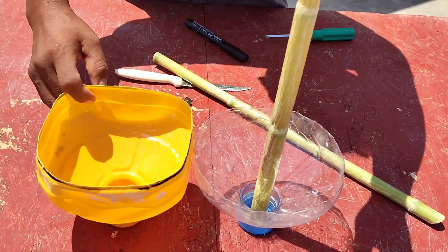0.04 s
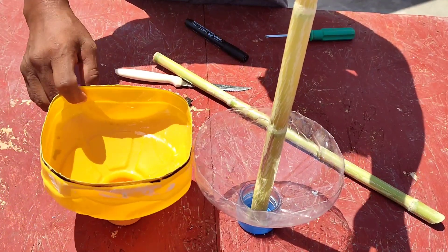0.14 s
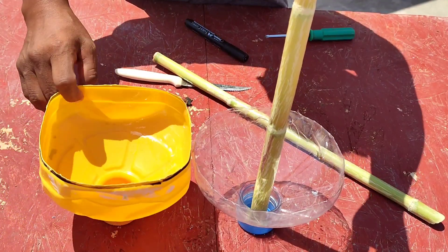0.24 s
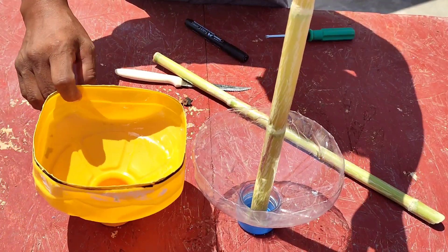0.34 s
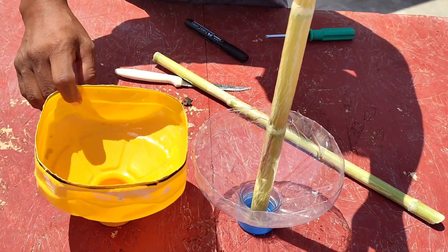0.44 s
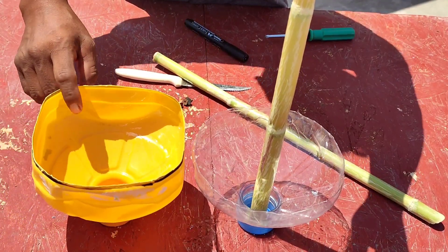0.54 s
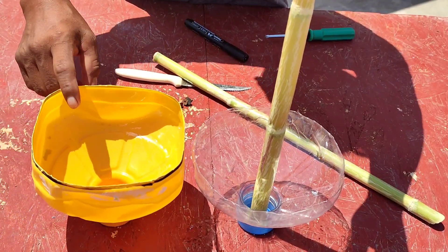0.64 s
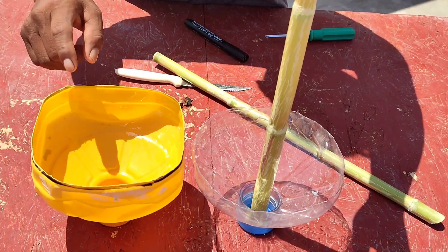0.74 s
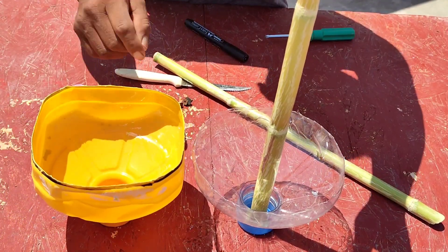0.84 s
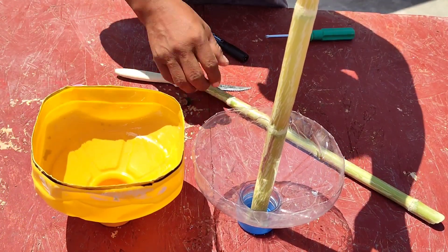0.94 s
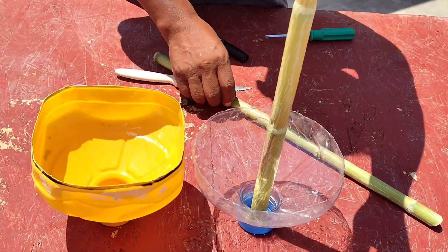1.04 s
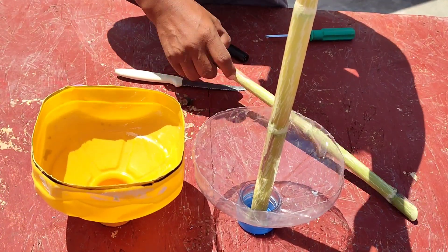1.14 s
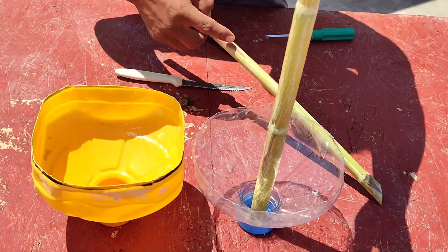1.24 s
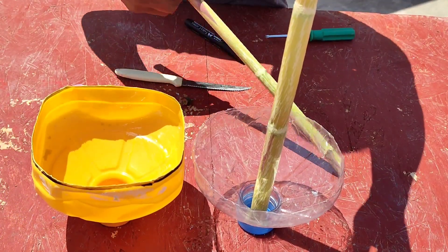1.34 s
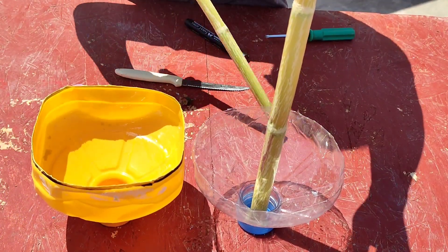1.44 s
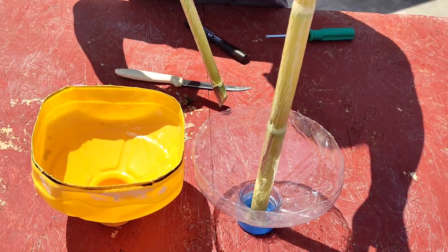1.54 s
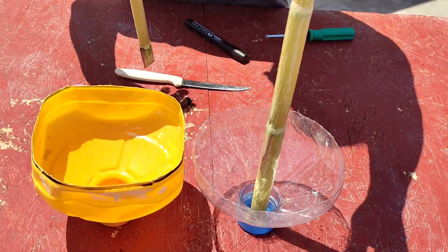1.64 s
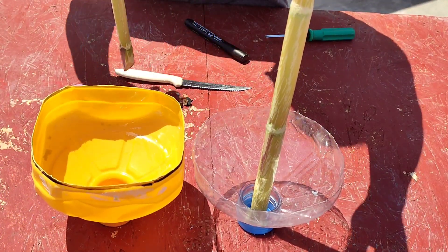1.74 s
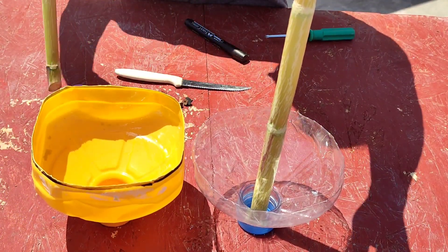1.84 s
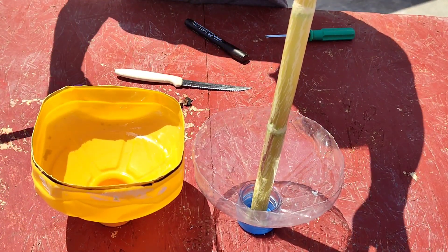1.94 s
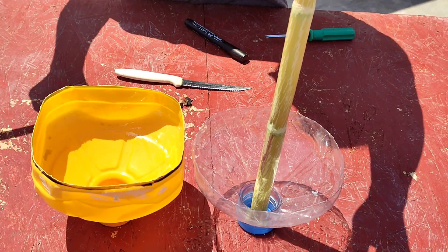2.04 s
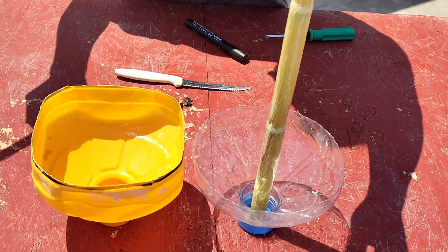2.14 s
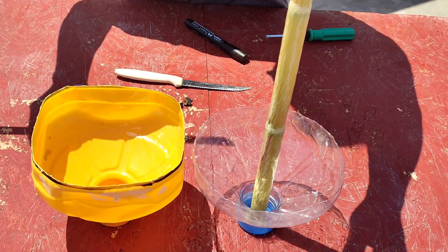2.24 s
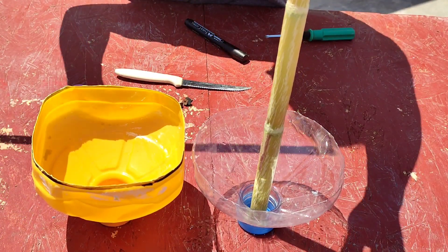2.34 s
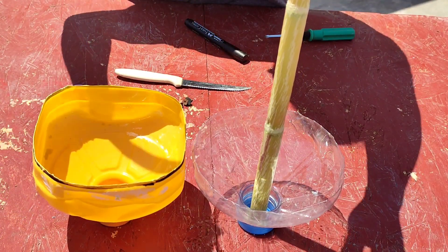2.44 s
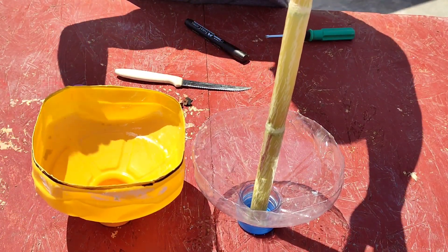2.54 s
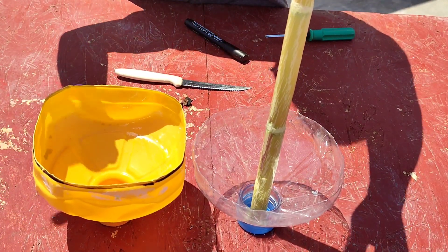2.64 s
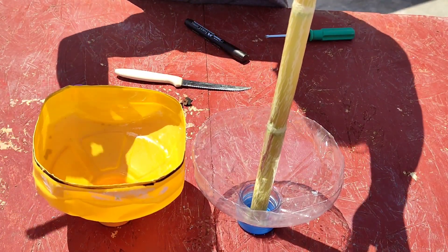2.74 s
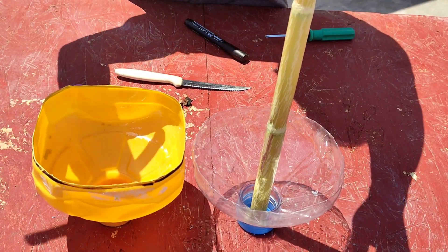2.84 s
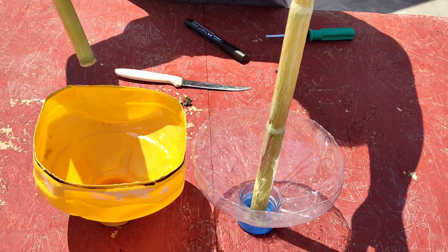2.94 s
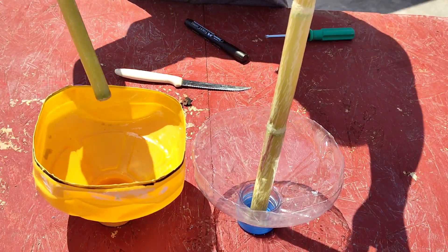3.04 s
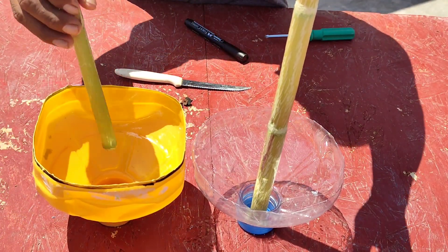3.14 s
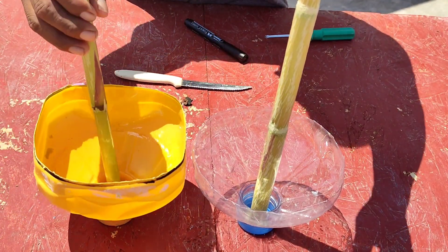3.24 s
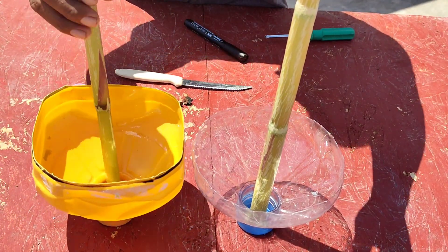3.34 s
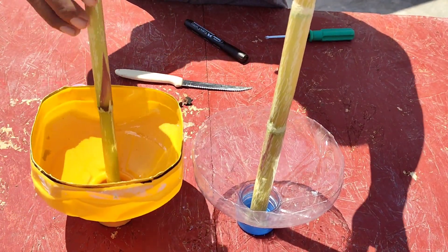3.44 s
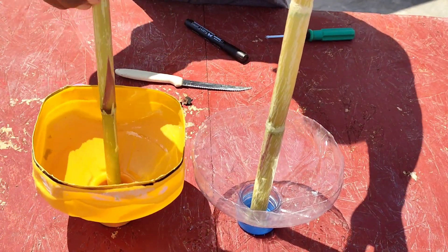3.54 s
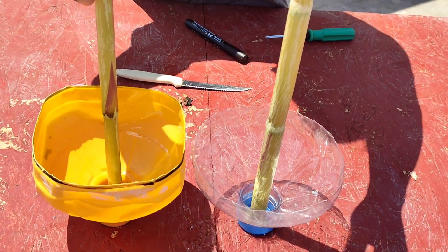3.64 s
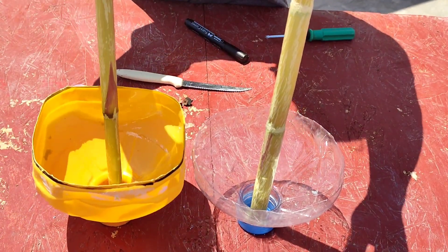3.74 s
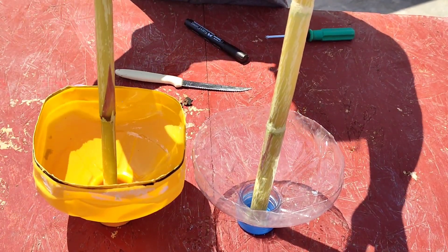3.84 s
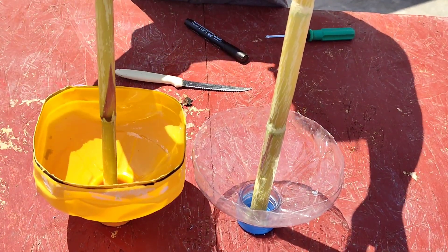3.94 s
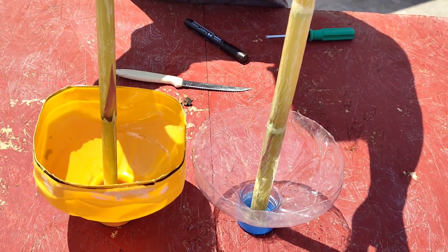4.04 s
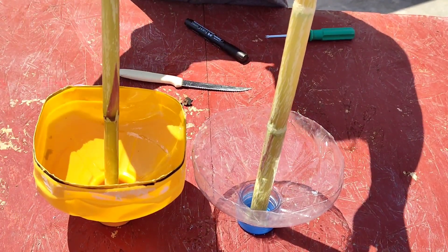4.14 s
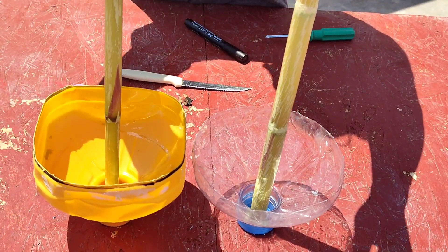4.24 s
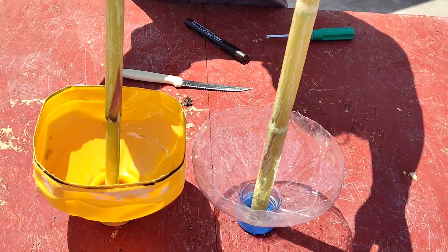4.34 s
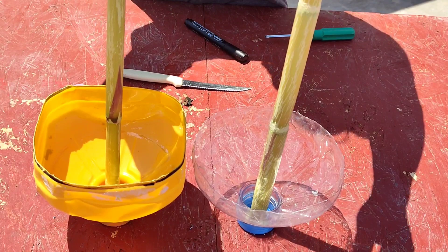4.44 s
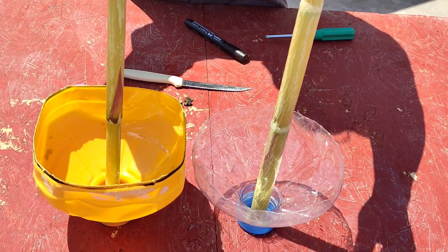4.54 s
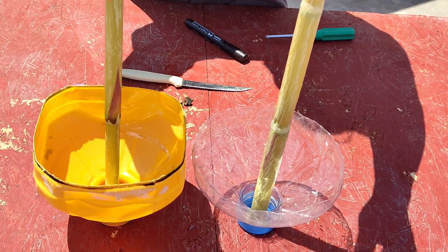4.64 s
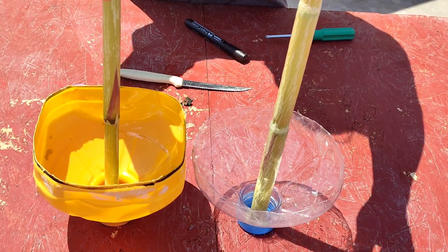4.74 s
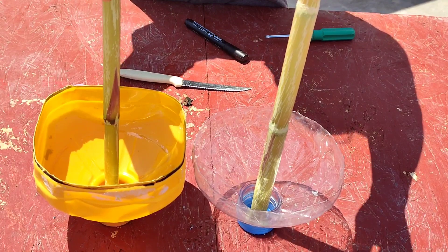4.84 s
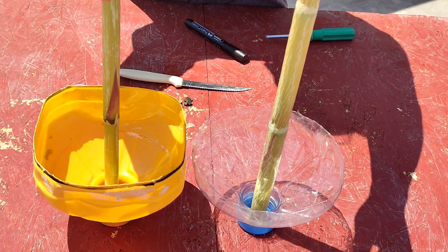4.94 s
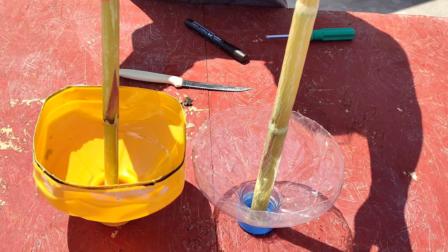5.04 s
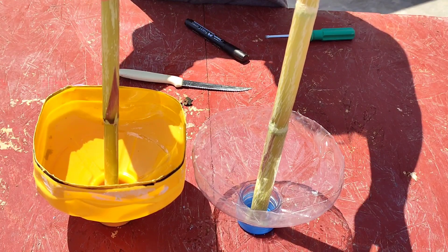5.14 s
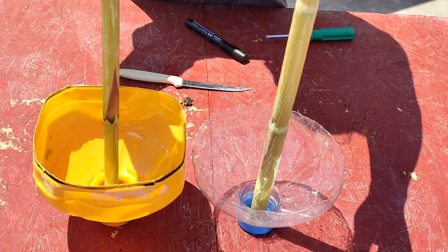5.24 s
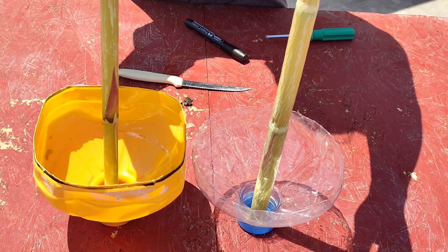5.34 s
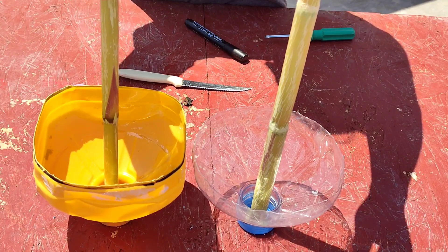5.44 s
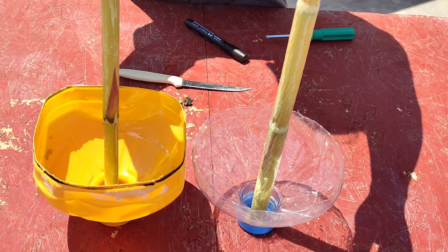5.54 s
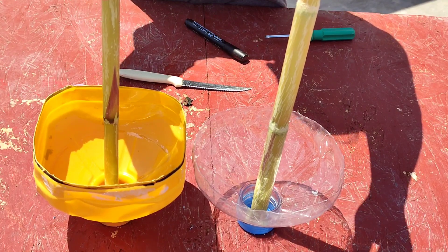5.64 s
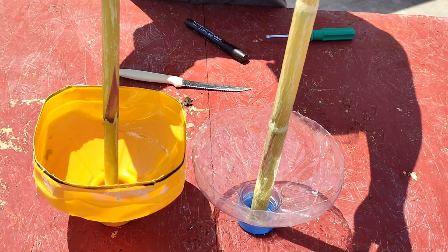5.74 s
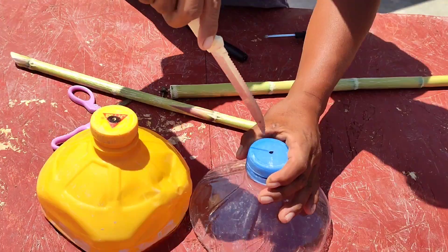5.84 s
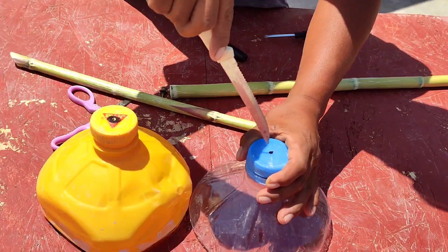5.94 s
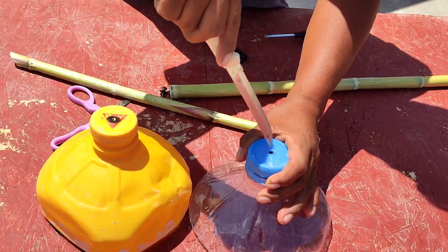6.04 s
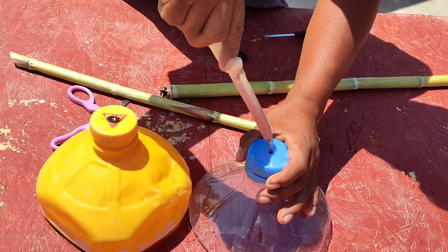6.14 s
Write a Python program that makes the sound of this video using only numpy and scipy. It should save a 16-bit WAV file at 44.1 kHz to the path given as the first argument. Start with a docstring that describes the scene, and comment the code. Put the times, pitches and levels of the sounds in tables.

```python
"""Hens cluck low and fast in a yard; hoarse squawks clear into a held note (pulsed membrane, throat filter).
Close by, a cane drags over a table and drops into a cut plastic bottle with one loud hollow knock,
among softer taps (contact pulses through bottle modes, plus rattle and crack noise).
Fingers hiss along the cane; light wind buffets the microphone over a faint yard hush (shaped noise).
"""
import sys
import numpy as np
from scipy import signal
from scipy.fft import rfft, irfft, next_fast_len
from scipy.io import wavfile

SR = 44100
rng = np.random.default_rng(int(sys.argv[2]) if len(sys.argv) > 2 else 0)


def dump_mix(stems):
    """Bounce the given channels to the path in sys.argv[1] as a 16-bit WAV at rate SR."""
    frames = np.atleast_2d(stems).T  # one column per channel
    limited = np.clip(frames, -1, 1)  # hard clip at full scale
    pcm = np.round(limited * 32767).astype(np.int16)
    wavfile.write(sys.argv[1], SR, pcm)


N = 272097
T = np.arange(N) / SR
TOP_HZ = 14350  # upper band limit


def undb(db):
    """Decibels to gain."""
    return 10 ** (np.asarray(db) / 20)


def unit(x):
    """Scale to rms 1."""
    return x / (np.sqrt(np.mean(x ** 2)) + 1e-12)


def seconds(length_s):
    """Time axis of one event, in seconds."""
    return np.arange(int(length_s * SR)) / SR


def add(out, start_s, x):
    """Mix x into out from start_s."""
    i = max(int(start_s * SR), 0)
    out[..., i:i + x.shape[-1]] += x[..., :N - i]


def colour(x, outline):
    """Filter by a (Hz, dB) outline, straight over log frequency."""
    hz, db = np.transpose(outline)
    n = next_fast_len(x.shape[-1])
    f = np.fft.rfftfreq(n, 1 / SR) + 1
    gain = undb(np.interp(np.log(f), np.log(hz), db))
    return irfft(rfft(x, n) * gain, n)[..., :x.shape[-1]]


def wobble(n, hz):
    """Random motion of rms 1, mostly slower than hz."""
    lowpass = signal.butter(2, hz, fs=SR, output="sos")
    settled = signal.sosfilt(lowpass, rng.standard_normal(n + SR // 10))[-n:]
    return unit(settled)


def stereo_noise(n, outline, shared):
    """Coloured noise; shared (0-1) is the power fraction common to both ports."""
    common, *own = rng.standard_normal((3, n))
    shared = np.clip(shared, 0, 1)
    mix = np.sqrt(shared) * common + np.sqrt(1 - shared) * np.array(own)
    return unit(colour(mix, outline))


def ports(x, lag_ms):
    """Delay the left port by lag_ms; a positive lag places the source to the right."""
    left, right = np.broadcast_to(x, (2, N))
    return np.array([np.interp(T - lag_ms / 1000, T, left), right])


def swell(t, length, rise, fall):
    """Sine-squared opening and closing, all in seconds."""
    opening = np.sin(np.pi / 2 * np.clip(t / rise, 0, 1)) ** 2
    closing = np.sin(np.pi / 2 * np.clip((length - t) / fall, 0, 1)) ** 2
    return opening * closing


def syrinx(hz, rough, jitter, jitter_hz, air):
    """Phase and band-limited pulses of an unevenly beating membrane, with a puff of air each cycle."""
    uneven_hz = hz * (1 + jitter * rough * wobble(len(hz), jitter_hz))
    phase = 2 * np.pi * np.cumsum(uneven_hz) / SR + 1e-6
    count = int(TOP_HZ / np.max(hz))  # harmonics
    pulses = np.sin((count + .5) * phase) / (2 * np.sin(phase / 2)) - .5
    pulses = pulses / np.sqrt(count / 2)
    puffs = air * rough * (1 + np.cos(phase)) * rng.standard_normal(len(hz))
    return phase, pulses + puffs


# Clucks. Each row: start in seconds, length in seconds, nominal pitch in Hz, voice gain in dB,
# upper-band brightness in dB.
CLUCKS = [(0.055, 0.049, 235.4, -55.5, 1), (0.185, 0.043, 237, -56, -4), (0.319, 0.041, 243.6, -57.5, -5.5),
          (0.461, 0.026, 232, -54.5, -1.5), (.607, 0.044, 218.5, -57, -14), (0.746, .044, 225.8, -54.5, -4),
          (0.883, 0.072, 242, -56.5, 0), (1.223, 0.059, 258.1, -52, -2), (2.381, 0.044, 233.3, -60, -6),
          (2.523, .047, 236.5, -57, -7), (2.67, 0.036, 235.7, -51.5, -9), (2.807, .052, 244.8, -52, -7),
          (2.953, 0.047, 251.8, -48.5, -13.5), (3.887, 0.0545, 241.2, -50.5, -7),
          (4.055, 0.061, 225.2, -53.5, -8), (4.226, 0.049, 226.6, -51.5, -9),
          (4.407, 0.04, 227.8, -53, -9.5), (4.562, 0.042, 219.1, -51, -8), (4.686, 0.054, 242.8, -51.5, -5),
          (4.816, 0.055, 236, -52.5, -0.5), (4.958, 0.052, 259.8, -52.5, 0),
          (5.091, 0.059, 239.6, -50.5, -6), (5.223, .058, 233.5, -52, -6), (5.373, 0.048, 228, -53, -0.5),
          (5.499, 0.034, 241.5, -61, 8.5), (6.093, 0.044, 244, -50, -8.5)]
# Cluck throat outline. Each row: frequency in Hz, gain in dB.
CLUCK_THROAT = [(150, -20), (240, -5), (450, 1), (720, 5), (1000, -1), (1300, -12.5), (1800, -10.5),
                (2500, -14.5), (3000, -24), (3500, -22.5), (5200, -38), (8000, -29.5), (10000, -45),
                (14000, -38)]
CLUCK_ARCH, CLUCK_ATTACK_S, CLUCK_RELEASE_S = .07, 0.015, 0.019
# roughness is signed: its size grows either side of about -2.6 dB brightness
CLUCK_ROUGH, CLUCK_ROUGH_PER_DB = .7, 0.27


def clucks():
    """Short low calls with varied pitch arch and throat; the beak opens just after the voice starts."""
    out = np.zeros(N)
    variations = rng.standard_normal((len(CLUCKS), 3))
    for (start_s, length_s, hz, db, bright_db), (arch, slope, gape) in zip(CLUCKS, variations):
        t = seconds(length_s + .015)
        u = t / t[-1]
        bend = (CLUCK_ARCH + .05 * arch) * (np.sin(np.pi * u) - .8) + .06 * slope * (u - .5)
        rough = CLUCK_ROUGH + CLUCK_ROUGH_PER_DB * bright_db
        _, source = syrinx(hz * (1 + bend), rough, jitter=.1, jitter_hz=200, air=.35)
        source = source * undb(1.6 * rough * wobble(len(t), hz=180))
        throat = unit(colour(source, np.array(CLUCK_THROAT) * [1 + .04 * gape, 1]))
        # a half-shut beak narrows the low resonance and hides the upper ones
        shut_db = .45 * min(bright_db, 0)
        body = colour(throat, [(480, shut_db), (720, 0), (1100, shut_db), (1600, -30)])
        body = body * swell(t, t[-1], CLUCK_ATTACK_S, CLUCK_RELEASE_S)
        upper = colour(throat, [(900, -30), (1300, 0)])
        beak = undb(bright_db) * swell(t, t[-1], rise=.032, fall=.024)
        add(out, start_s, undb(db) * (body + beak * upper))
    return out


# Stages shared by all squawks, joined by straight lines: onset, hoarse cry, sag to a growl, pressure
# builds, breaks upward, clears, held note, tightens, runs out of air, end. Each row: base pitch in Hz,
# roughness 0-1, base fundamental in dB, base second partial in dB, base rasp in dB.
STAGES = [(601.6, 0.71, -63, -55.5, -67), (607.7, .72, -73, -51.5, -67.5), (478.3, .72, -73, -54.5, -68.5),
          (508.6, .68, -57.5, -50.5, -66.5), (623, .55, -47.5, -55, -54.5), (600, 0.27, -52, -51.5, -63.5),
          (593, 0.09, -58.5, -50, -63.5), (615, 0.37, -48.5, -60.5, -63.5), (613, 0.52, -50.5, -55, -64.5),
          (602, 0.83, -62, -69, -79)]
# Squawk rasp outline. Each row: frequency in Hz, gain in dB.
SQUAWK_RASP = [(1200, 2), (1500, 10), (1950, 10), (2200, 9.5), (2500, 5.5), (3000, .5), (3400, 5.5),
               (4500, -3.5), (5300, -8), (7600, -6), (9200, -18.5), (14000, -15)]
CRY_S, SAG_S, BREAK_S, TIGHTEN_S, FADE_S = .028, .068, .028, 0.02, 0.054
SQUAWK_ATTACK_S, SQUAWK_RELEASE_S = 0.0078, .018
SECOND_HZ, SECOND_PULL = 435, .36  # second membrane's own pitch; how far the first drags it (0-1)


def squawk(start, breaks, clear, tightens, end, growl_db, note_db, raised_hz, favour_db):
    """A long call: two strong partials and a rasp; when hoarse, a second membrane beats against the first."""
    n = int((end - start) * SR)
    t = start + np.arange(n) / SR
    times = [start, start + CRY_S, start + SAG_S, breaks - BREAK_S, breaks + BREAK_S, clear,
             tightens - TIGHTEN_S, tightens + TIGHTEN_S, end - FADE_S, end]
    tracks = (np.interp(t, np.sort(times), column) for column in np.transpose(STAGES))
    hz, rough, low_db, octave_db, rasp_db = tracks
    note = np.interp(t, [breaks - BREAK_S, breaks + BREAK_S], [0, 1])  # 0 growl, 1 note
    hz = hz + raised_hz * note
    phase, source = syrinx(hz, rough, jitter=.04, jitter_hz=80, air=.4)
    second_hz = SECOND_HZ + SECOND_PULL * (hz - SECOND_HZ)
    second_phase, second = syrinx(second_hz, rough, jitter=.08, jitter_hz=40, air=.2)
    throat_noise = unit(colour(rng.standard_normal(n), [
        (300, -3.5), (500, -18), (800, -0.5), (1000, 4), (1250, 5.0), (1450, -7), (3000, -80)]))
    low = np.sqrt(2) * np.sin(phase) * (1 + 0.76 * rough * wobble(n, hz=122))
    hoarse = np.sqrt(2) * np.sin(2 * second_phase) + 1.1 * throat_noise
    octave = (np.sqrt(2) * np.sin(2 * phase) + rough * hoarse) / np.sqrt(1 + 2 * rough ** 2)
    rasp = unit(colour(source + 1.6 * rough * second, SQUAWK_RASP))
    voice = undb(low_db + favour_db * note) * low
    voice = voice + undb(octave_db - favour_db * note) * octave
    voice = voice + undb(rasp_db) * rasp
    level = undb(growl_db * (0.5 - note) + note_db * note)
    return voice * level * swell(t - start, end - start, SQUAWK_ATTACK_S, SQUAWK_RELEASE_S)


# Squawks. Each row: start, break, clear, tighten and end in seconds, growl-over-note tilt in dB
# (half added before the break, half taken off after), note gain in dB, note raise in Hz,
# gain in dB added to the note's fundamental and taken off its second partial.
SQUAWKS = [(0.794, 0.938, 1.06, 1.128, 1.2, 2, 1.5, 0.5, -1.5),
           (3.336, 3.485, 3.54, 3.65, 3.745, -0.5, 2, 23, 4),
           (5.309, 5.537, 5.635, 5.725, 5.885, -1.5, -.5, 0, 1)]


def squawks():
    """All long calls, each run through the stages at its own times."""
    out = np.zeros(N)
    for call in SQUAWKS:
        add(out, call[0], squawk(*call))
    return out


# Hoot throat outline. Each row: frequency in Hz, gain in dB.
HOOT_THROAT = [(550, 2), (1100, -4), (1650, -19), (3400, -31.5), (5000, -42), (14000, -52)]
HOOT_S, HOOT_LENGTH_S, HOOT_DB, HOOT_ROUGH = 3.753, .09, -43, 0.53
HOOT_HZ, HOOT_ARCH_HZ = 505, 62.2


def hoot():
    """A short call just after the second squawk; its membrane pitch arches up and back."""
    out = np.zeros(N)
    t = seconds(HOOT_LENGTH_S)
    hz = HOOT_HZ + HOOT_ARCH_HZ * np.sin(np.pi * t / HOOT_LENGTH_S)
    _, source = syrinx(hz, HOOT_ROUGH, jitter=.04, jitter_hz=80, air=.4)
    voice = undb(HOOT_DB) * unit(colour(source, HOOT_THROAT))
    add(out, HOOT_S, voice * swell(t, HOOT_LENGTH_S, rise=0.025, fall=0.065))
    return out


HEN_LAG_MS = 0.27
REFLECTION_MS, REFLECTION_DB = 3.25, -13.5


def hens():
    """Birds off to the right; one near surface mirrors them and the yard scatters a short echo."""
    voice = clucks() + squawks() + hoot()
    # the head moves, so the reflection sweeps slowly through the overtones
    delay_ms = REFLECTION_MS + .03 * wobble(N, hz=4)
    mirrored = np.interp(T - delay_ms / 1000, T, voice)
    mirrored = colour(mirrored, [(500, -10), (1800, 1), (8000, -1.5)])
    voice = voice + undb(REFLECTION_DB) * mirrored
    t = np.arange(SR // 2) / SR
    echo = stereo_noise(len(t), [(200, -10.5), (700, -3.5), (1200, -4.5), (3000, 4), (8000, 6),
                                 (14000, -8)], shared=0.19)
    echo *= (undb(-60 * t / .03) + undb(-13.0 - 60 * t / .3)) * (t > .003)
    echo /= np.sqrt(np.sum(echo ** 2) / 2)
    direct = ports(voice, HEN_LAG_MS) * undb([[0], [.9]])
    return direct + undb(1.5) * signal.fftconvolve(voice[None], echo, axes=1)[:, :N]


# Modes of the cut bottle standing on the table. Each row: frequency in Hz, relative level in dB,
# undamped t60 in seconds.
BOTTLE = [(133, -18.5, 0.11), (190.4, -17.5, 0.083), (217.5, -16.5, 0.164), (338, -15.5, 0.17),
          (382.5, -35.5, .2), (422, -14.5, .13), (506, -24, 0.02), (551, -28.5, .13), (615, -15, 0.063),
          (673, -14, 0.11), (704, -27.5, 0.25), (770, -34.5, 0.078), (897, -42.5, 0.12), (1040, -35, 0.053),
          (1140, -41, 0.028), (1524, -26, 0.12), (1586, -20.5, 0.027), (1696, -19.5, .044),
          (1810, -5.5, .014), (1950, -16.5, .018), (2100, -19, 0.017), (2350, -18, .017)]


def bottle_ring(t):
    """Response of the bottle to a unit push: a wall dent, then modes damped by the cane."""
    ring = -sum(undb(db - 60 * t / t60) * np.sin(2 * np.pi * hz * t) for hz, db, t60 in BOTTLE)
    # the cane stays against the wall and soon damps it
    ring *= 0.56 + .7 * np.exp(-(t / 0.011) ** 2)
    # the ringing takes a moment to spread; first the wall just dents in and springs back
    ring *= 1 - np.exp(-t / .0006)
    dent = (t - .0006) / .00026
    ring += 1.1 * dent * np.exp(-dent ** 2 / 2) * (1 - np.exp(-t / .0002))
    return ring


# Blows on bottle and table. Each row: start in seconds, push gain in dB, contact time in ms,
# crack gain in dB.
BLOWS = [(.138, -46.5, 0.14, -67), (0.7514, -18, 4.2, -68), (1.193, -29.5, 1.43, -76),
         (1.214, -25, 2.4, -56.5), (1.244, -40, 0.8, -59), (1.266, -27, 2.8, -61), (1.298, -27, 2.3, -51),
         (1.346, -52, 0.91, -61.5), (2.045, -19.5, 10, -71), (3.0518, -.7, 0.15, -34.5),
         (3.081, -41.5, .4, -39), (3.085, -22, 0.32, -36.5), (3.114, -19.5, 1.5, -42.5),
         (3.118, -30.5, 0.55, -39.5), (3.139, -20.5, 2.1, -50), (3.180, -36.5, 0.4, -81),
         (3.34, -35, 1, -70), (3.648, -29.5, .4, -73), (5.899, -30, 0.87, -68), (5.956, -34.5, 0.079, -54)]
# Rattle noise outline. Each row: frequency in Hz, gain in dB.
RATTLE = [(60, -6.5), (200, -15.5), (270, -22), (350, -0.5), (700, -7), (1000, -10.5), (1300, -23),
          (1650, -15.5), (2400, -26.5), (4000, -35.5), (14000, -28)]
# Crack noise outline. Each row: frequency in Hz, gain in dB.
CRACK = [(500, -10), (1800, 0), (2700, 1.5), (4000, -4.5), (5500, -3.5), (7700, 2), (9500, -12.5),
         (12000, -5), (14000, -7)]


def blows():
    """Each contact rings the bottle; a soft one pushes longer and leaves only a thud, a hard one cracks."""
    t = np.arange(SR // 2) / SR
    ring = bottle_ring(t)
    rattle_fade = undb(-18 - 60 * t / 0.053) + undb(-22.5 - 60 * t / 0.19) + undb(-45.5 - 60 * t / .5)
    rattle_fade = rattle_fade * (1 - np.exp(-t / 0.00067))
    crack_fade = (undb(-60 * t / .028) + undb(-19 - 60 * t / .16)) * (1 - np.exp(-t / .0005))
    direct, scattered, cracks = np.zeros(N), np.zeros((2, N)), np.zeros((2, N))
    for start_s, db, contact_ms, crack_db in BLOWS:
        age = t * 1000 / max(contact_ms, .02)
        push = (age + 1e-3) * np.exp(-5 * age)
        push *= undb(db) / push.sum()
        rattle = stereo_noise(len(t), RATTLE, shared=.65) * rattle_fade
        crack = stereo_noise(len(t), CRACK, shared=0.37) * undb(crack_db) * crack_fade
        add(direct, start_s, signal.fftconvolve(ring, push)[:len(t)])
        add(scattered, start_s, signal.fftconvolve(rattle, push[None], axes=1)[:, :len(t)])
        add(cracks, start_s, crack)
    # the knock is dimmed around 1.3 kHz and falls away steeply above about 2.5 kHz
    direct = colour(direct, [(850, -1), (1270, -9), (1500, 0.5), (2350, 3.5), (2700, -16), (6000, -20.5)])
    # cracks are about 2 dB louder at the left port than at the right
    return ports(direct + scattered, lag_ms=-.135) + cracks * undb([[1], [-1]])


# Drag noise outline. Each row: frequency in Hz, gain in dB.
DRAG = [(50, -26), (130, 11), (220, -12), (350, -1.5), (600, -20), (1500, -26.5), (5000, -51)]
DRAG_S, DRAG_LENGTH_S, DRAG_DB = 1.3, 0.16, -52


def drag():
    """The cane judders across the table top as it is picked up: a low uneven rumble."""
    out = np.zeros(N)
    t = seconds(DRAG_LENGTH_S)
    rumble = unit(colour(rng.standard_normal(len(t)), DRAG))
    judder = undb(DRAG_DB + 3 * wobble(len(t), hz=60))
    add(out, DRAG_S, rumble * judder * swell(t, DRAG_LENGTH_S, rise=0.015, fall=0.14))
    return out


# Finger slides on cane and plastic. Each row: start in seconds, length in seconds, level in dB.
SLIDES = [(1.131, 0.097, -69), (2.697, 0.15, -72.5), (3.291, 0.26, -72), (4.11, 0.2, -69.5),
          (4.521, 0.23, -75), (5.893, 0.13, -71.5), (6.039, 0.12, -74.5)]
# Skin noise outline. Each row: frequency in Hz, gain in dB.
SKIN = [(1000, -9), (4400, -15), (5300, -10), (8000, -7), (9500, -15.5), (12000, -15.5), (14000, -12)]


def slides():
    """Skin catches and slips in a thin uneven hiss."""
    out = np.zeros((2, N))
    for start_s, length_s, db in SLIDES:
        t = seconds(length_s)
        hiss = stereo_noise(len(t), SKIN, shared=0.89)
        grip = undb(db + 2.8 * wobble(len(t), hz=45))
        add(out, start_s, hiss * grip * swell(t, length_s, rise=0.0071, fall=0.071))
    return out


# Gusts. Each row: time of peak in seconds, half width in seconds, relative strength in dB.
GUSTS = [(.02, 0.12, -48.5), (.39, 0.078, -44), (.62, 0.25, -46), (.89, 0.15, -44.5), (1.66, 0.053, -47),
         (2.082, 0.18, -37.5), (2.569, 0.027, -42), (2.809, 0.27, -48.5), (3.331, 0.11, -52.5),
         (3.69, .05, -51), (4.92, 0.35, -51.5), (5.931, 0.045, -37.5), (6.16, 0.15, -35)]
# Single eddies that slap the microphone. Each row: time in seconds, half width in ms, relative peak in dB.
EDDIES = [(0.752, 1.8, -29), (1.895, 1.94, -37), (2.043, 1.78, -23), (2.111, 2.1, -30),
          (5.943, 11.4, -30.5), (6.124, 2.2, -28), (6.157, 1.47, -27.5)]
# Buffet noise outline. Each row: frequency in Hz, gain in dB.
BUFFET = [(10, -6.5), (42, 2), (70, -4), (110, -8), (170, -37.5), (400, -69.5), (1000, -77)]
# Flutter noise outline. Each row: frequency in Hz, gain in dB.
FLUTTER = [(50, -29), (130, 7.5), (220, 0.5), (350, -7.5), (600, -51), (1500, -47.5), (5000, -61.5)]
BREEZE_DB = -58  # relative strength, as for gusts
FLUTTER_BELOW_DB, FLUTTER_ONSET_DB = 14, -43
FLUTTER_GROWTH = 0.64  # extra dB per dB over the onset


def wind():
    """Gusts out of a light breeze push on each port; strong ones flutter more, and eddies slap."""
    gusts = sum((undb(db) * np.exp(-((T - s) / width) ** 2)) ** 2 for s, width, db in GUSTS)
    db = 10 * np.log10(undb(BREEZE_DB) ** 2 + gusts)
    flutter_db = db - FLUTTER_BELOW_DB + FLUTTER_GROWTH * np.maximum(db - FLUTTER_ONSET_DB, 0)
    buffet = stereo_noise(N, BUFFET, shared=0.13) * undb(db + 5)
    lumps = undb(3.5 * wobble(N, hz=35))
    flutter = stereo_noise(N, FLUTTER, shared=0.93) * undb(flutter_db) * lumps
    slaps = 0
    for s, width_ms, peak_db in EDDIES:
        age = (T - s) * 1000 / width_ms
        slaps = slaps - undb(peak_db) * (1 - age ** 2) * np.exp(-age ** 2 / 2)
    return (buffet + slaps + flutter) * undb([[1.5], [-1.5]])


# Yard hush outline. Each row: frequency in Hz, gain in dB.
YARD = [(240, -15.5), (400, 1.5), (829, -2.5), (948, -2), (1040, -4), (1480, -6.5), (2460, -13),
        (7170, -21), (9230, -22.5), (14000, -19.5)]
YARD_DB, YARD_LAG_MS = -69.5, .29


def yard():
    """Faint unsteady hush; the part common to both ports reaches the right one first."""
    hush = stereo_noise(N, YARD, shared=0.26) * undb(YARD_DB + 1.9 * wobble(N, hz=17))
    return ports(hush, YARD_LAG_MS)


def scene():
    """Hens, table, fingers and wind over the hush of the yard."""
    return hens() + blows() + drag() + slides() + wind() + yard()


# Pause. Start in seconds, end in seconds.
PAUSE = (5.758, 5.822)


def record(dry):
    """The recorder pauses for an instant, leaving a gap, and a steep low-pass cuts the top."""
    running = (T < PAUSE[0]) | (T > PAUSE[1])
    lowpass = signal.ellip(10, .2, 80, TOP_HZ, fs=SR, output="sos")
    return signal.sosfilt(lowpass, dry * running)


dry = scene()
out = record(dry)
dump_mix(out)
```